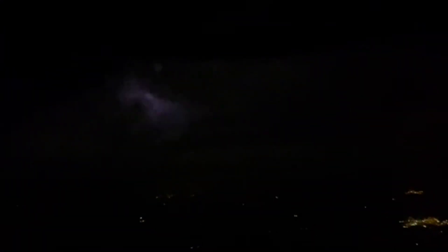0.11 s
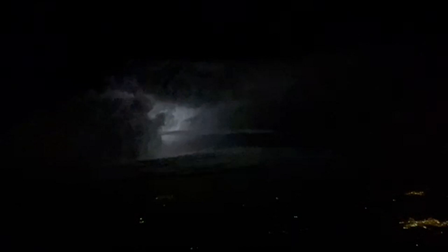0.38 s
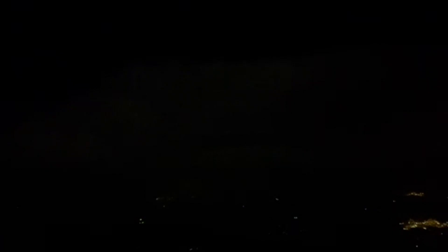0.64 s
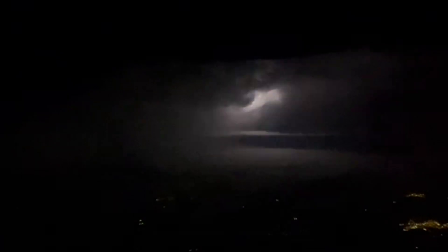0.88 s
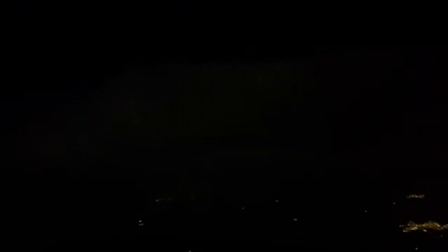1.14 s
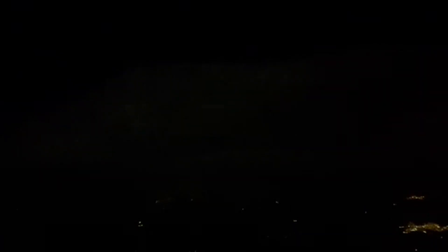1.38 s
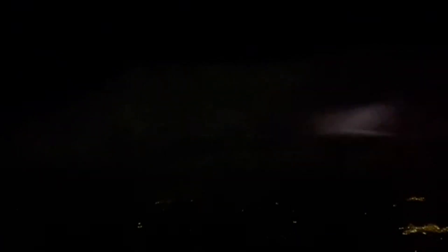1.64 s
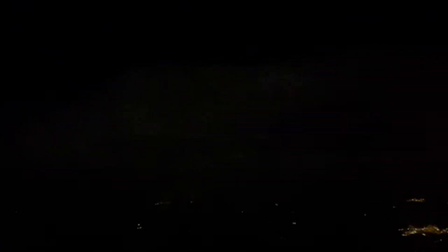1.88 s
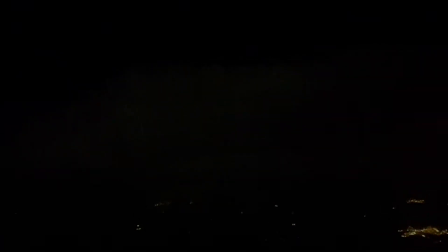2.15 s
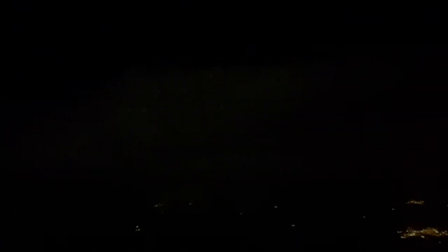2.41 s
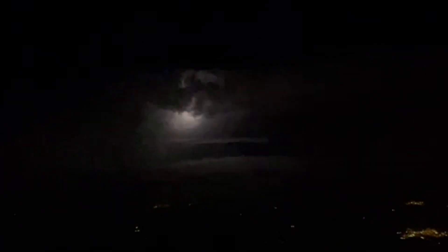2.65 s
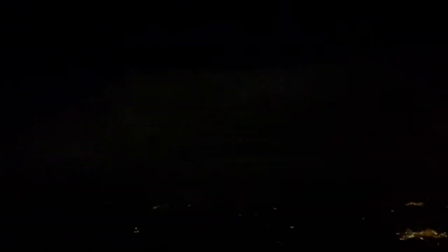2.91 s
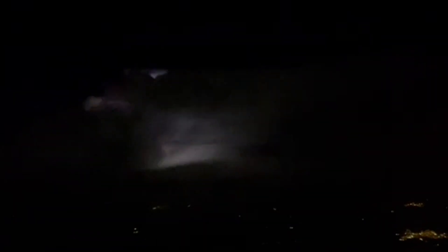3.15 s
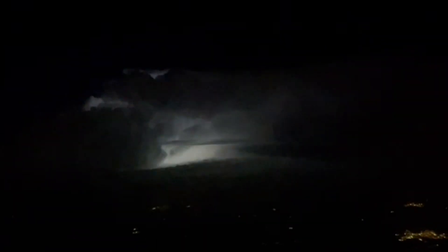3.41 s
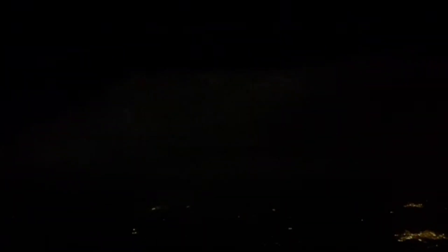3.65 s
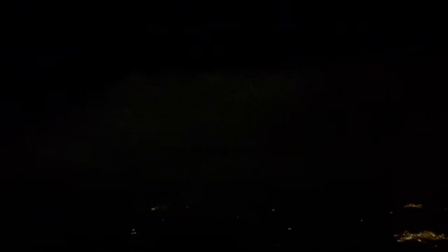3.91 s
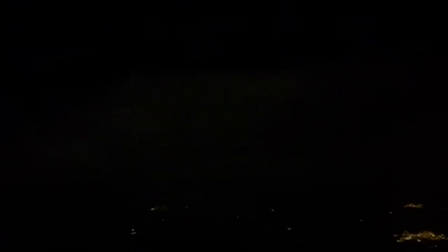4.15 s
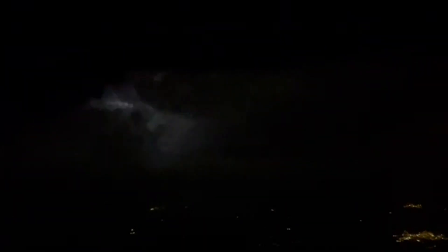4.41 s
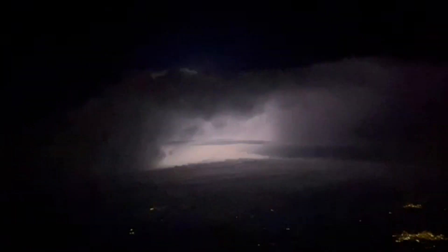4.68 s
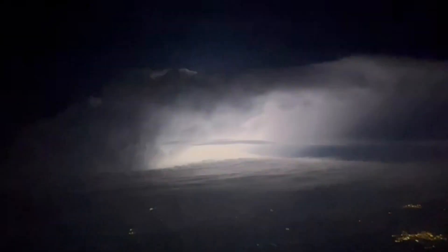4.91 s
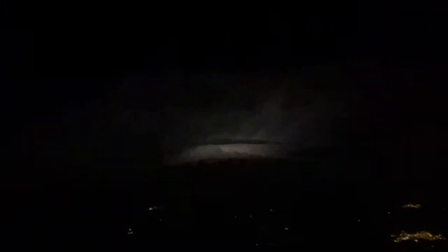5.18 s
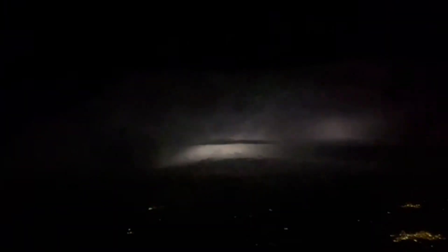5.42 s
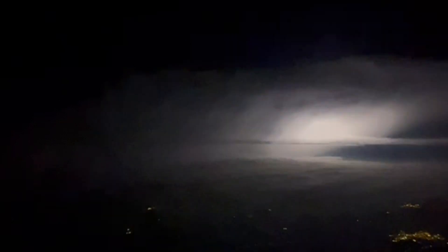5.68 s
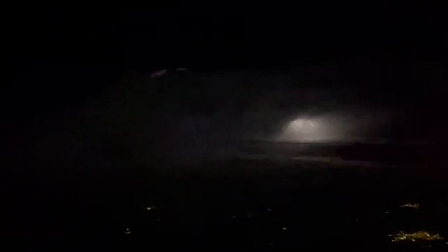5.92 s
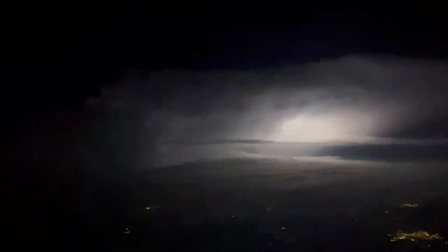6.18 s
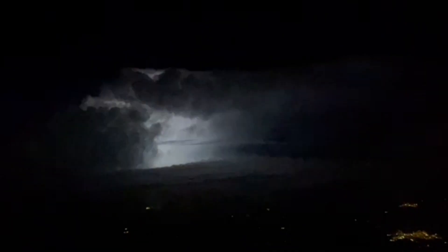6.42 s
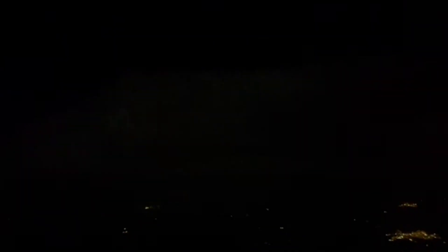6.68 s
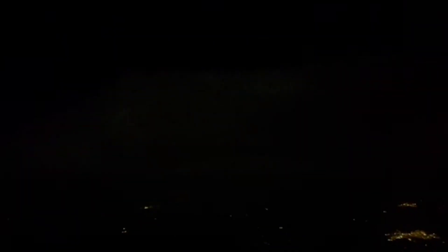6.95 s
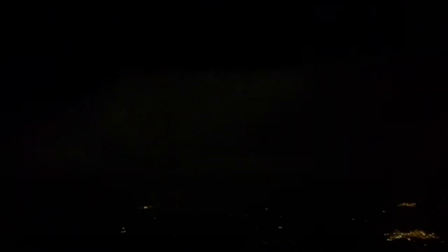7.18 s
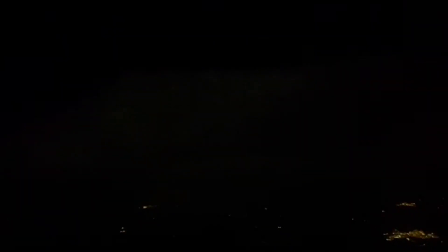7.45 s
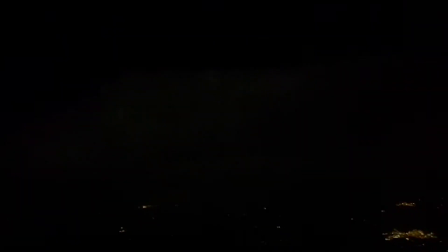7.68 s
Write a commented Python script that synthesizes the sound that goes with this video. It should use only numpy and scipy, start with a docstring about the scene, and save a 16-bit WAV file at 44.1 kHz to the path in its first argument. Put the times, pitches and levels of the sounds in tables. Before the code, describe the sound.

Inside an airliner cruising at night past a distant thunderstorm, a dense low roar of airflow fills everything from start to end. Under it a noisy bass boom wavers and swells irregularly, while two engines give a faint low hum that slowly beats. Air vents add a barely audible hiss. Close stereo pickup by the window; the lightning flashes make no sound.

```python
"""Airliner cabin in cruise

Close to a window, airflow shakes the fuselage skin into a deep roar: noise shaped by wall and window resonances.
A low boom, a narrow noisy tone swung by random pushes, wavers, swells and sinks by chance. Two engines hum at
almost the same pitch, two sines that beat slowly. The air vents add a faint hiss of patchy noise and one thin
whistle. Two close microphone ports receive it all, followed by gentle gain control and a peak limiter."""
import sys
import numpy as np
from scipy import signal
from scipy.fft import rfft, irfft, next_fast_len
from scipy.io import wavfile
from scipy.ndimage import uniform_filter1d, minimum_filter1d, map_coordinates

SR = 44100
rng = np.random.default_rng(int(sys.argv[2]) if len(sys.argv) > 2 else 0)


def put_to_file(sound):
    """Save the sound as 16-bit audio at rate SR, in the file named by the first command-line argument."""
    columns = np.atleast_2d(sound).T  # one column per channel
    safe = np.clip(columns, -1, 1)
    whole_steps = np.round(safe * 32767)
    wavfile.write(sys.argv[1], SR, whole_steps.astype(np.int16))


def attenuation_scalar(level_db):
    """Turn a level in dB into a linear amplitude multiplier (20 dB per decade)."""
    decades = np.asarray(level_db, float) / 20
    return 10 ** decades


N = 344862  # length in samples


def unit(x):
    """Normalization: the signal scaled to an rms of 1."""
    return x / np.sqrt(np.mean(x ** 2))


def along(points, hz):
    """Logarithmic frequency scale: (Hz, value) points interpolated on a log axis."""
    point_hz, value = np.transpose(points)
    return np.interp(np.log(hz + 1), np.log(point_hz + 1), value, left=value[0], right=value[-1])


def wobble(rate):
    """Slow random modulation: a smooth curve through random knots, rate knots a second."""
    knots = rng.standard_normal(int(N * rate / SR) + 4)
    return map_coordinates(knots, [np.arange(N) * rate / SR])


def rush(colour_db, patchy_db):
    """Stereo image: patchy noise of rms 1, its likeness, phase and balance set by frequency."""
    # likeness of left and right: freq_hz, likeness (0-1)
    likeness = [(110, 1), (155, 0.94), (200, 0.97), (270, 0.88), (350, 1), (430, 0.76), (620, 0.7),
                (720, 0.16), (1200, 0), (2000, 0.8), (3600, 0.5), (4400, 0.97), (7000, 1), (9000, 0.97),
                (11500, 1)]
    # phase by which left leads right: freq_hz, lead_rad
    phase_lead = [(100, 0), (360, 0), (620, .5), (800, -2.5), (1400, -1), (1750, -1), (2300, -0.86),
                  (5200, 0.84), (6700, 0), (8000, 0.94), (8600, 0), (9050, -1), (10100, -3), (10350, -3),
                  (11650, -6)]
    # level of left minus right: freq_hz, difference_db
    balance = [(60, 0.45), (450, 1), (1100, 1), (1900, -1), (2500, 0.5), (4600, 2), (5800, 2), (6400, 0.0)]

    spectrogram = signal.stft(rng.standard_normal((2, N)), nperseg=512)[2]
    # random gains smoothed over 8 frequency bins and 12 time frames
    field = uniform_filter1d(rng.standard_normal(spectrogram.shape[1:]), size=8, axis=0)
    field = uniform_filter1d(field, size=12, axis=1)
    patches = attenuation_scalar(patchy_db * unit(field))
    pair = signal.istft(spectrogram * patches, nperseg=512)[1][:, :N]

    size = next_fast_len(N + 8192)
    hz = np.fft.rfftfreq(size, 1 / SR)
    shared, own = rfft(pair, size)
    # cos(2 * angle) is the likeness of the sum and difference mixes
    angle = np.arccos(np.clip(along(likeness, hz), 0, 1)) / 2
    stereo = np.cos(angle) * shared + np.outer([1, -1], np.sin(angle) * own)
    # half of the balance and lead on each side
    offset = attenuation_scalar(along(balance, hz) / 2) * np.exp(0.5j * along(phase_lead, hz))
    coloured = stereo * [offset, 1 / offset] * attenuation_scalar(colour_db(hz))
    return unit(irfft(coloured, size)[:, :N])


def roar():
    """Turbulent boundary layer: air drums on the skin, and panel resonances shape it unevenly left and right."""
    # airflow roar through the wall: freq_hz, relative_level_db (per Hz)
    wall_noise = [(20, -62), (33, -51.5), (42, -42.5), (62, -31.5), (95, -39), (170, -44), (255, -46),
                  (450, -47), (560, -51.5), (1000, -58), (1250, -61.5), (1600, -73.5), (2200, -81.5),
                  (3800, -100)]
    # resonances of wall panels and window: centre_hz, width_hz, left_lift_db, right_lift_db
    panels = [(72, 21, -1.5, 0.5), (140, 24, 3.5, 2.5), (207.6, 17, 3.5, 5), (258, 16, -1, -1),
              (286.8, 20, 5.5, 4.5), (347, 57.6, 9, 10), (393, 69, 4.5, 5.5), (533, 23, 1, 1),
              (649, 59, 5, 4.5), (733, 23, 3.5, 1.5), (780, 38, -1.5, -2.5), (907.6, 88, 4.5, 8.5),
              (1474, 150, 1, 3.5), (1950, 74, 1, 3), (2600, 430, 1.5, 1), (3160, 420, 4.5, 3)]

    def colour_db(hz):
        """Superposed resonance curves: each lift falls to half its dB at half a width from its centre."""
        lift_db = 0
        for centre_hz, width_hz, *side_db in panels:
            lift_db = lift_db + np.outer(side_db, 1 / (1 + (2 * (hz - centre_hz) / width_hz) ** 2))
        cut_db = -60.0 * (hz > wall_noise[-1][0])  # above the last point
        return along(wall_noise, hz) + lift_db + cut_db

    level_db = -12.0 + 0.12 * wobble(2.5)
    return attenuation_scalar(level_db) * rush(colour_db, patchy_db=0.31)


def boom():
    """Randomly driven resonance: turbulence pushes the lowest cabin mode into a narrow, wavering noisy drone."""
    # one chance run of the noisy boom's pitch and level, with further random swing added:
    # time_s, pitch_hz, level_db
    chance_run = [(0.0, 68.7, -22.5), (0.17, 68.6, -20.5), (0.3, 77.36, -20.5), (0.41, 76.8, -23.5),
                  (0.5, 72.65, -18), (0.59, 68.66, -20.5), (0.63, 70.71, -14), (1.18, 75.5, -16),
                  (1.28, 76.4, -29.5), (1.46, 72.1, -13), (1.76, 71.9, -15), (2.2, 76.3, -16),
                  (2.4, 75.9, -24.5), (2.57, 75.9, -9.5), (2.63, 76.2, -21.5), (2.92, 73.0, -16.5),
                  (3.07, 67.9, -20.5), (3.29, 70.9, -14.5), (3.48, 75.9, -23), (3.94, 70.2, -16),
                  (4.4, 67.77, -20), (4.55, 74.8, -17), (4.73, 70.2, -16), (5.03, 73.5, -12.5),
                  (5.38, 68.1, -24), (5.66, 71.8, -10.5), (5.88, 72, -17), (5.99, 70.5, -14.5),
                  (7.08, 74.75, -19), (7.32, 70.2, -16), (7.51, 74.7, -14.5), (7.82, 76.1, -26.5)]
    push_rate, evened = 3, 0.89  # knots a second; how far push sizes are evened out (0-1)

    time_s, pitch_hz, level_db = np.transpose(chance_run)
    t = np.arange(N) / SR
    push = wobble(push_rate) + 1j * wobble(push_rate)
    swing = push / (np.abs(push) + 0.05) ** evened
    phase = 2 * np.pi * np.cumsum(np.interp(t, time_s, pitch_hz)) / SR
    drone = unit(np.real(swing * np.exp(1j * phase)))
    return attenuation_scalar(np.interp(t, time_s, level_db)) * drone


def engines():
    """Beating: two steady tones a fraction of a hertz apart swell and cancel in turn."""
    mean_hz, beat_hz, in_step_s = 204.7, 0.47, 0.465  # mean pitch, difference, a moment near being in step
    level_db = -28.7 + 1.2 * wobble(6.4)  # rms of each tone
    t = np.arange(N) / SR - in_step_s
    # product form of the sum of two sines
    beat = 2 * np.cos(np.pi * beat_hz * t + 0.066 * wobble(0.78))
    return attenuation_scalar(level_db) * np.sqrt(2) * beat * np.sin(2 * np.pi * mean_hz * t)


def vents():
    """Jet noise: fine streams of air give a faint patchy hiss, with one thin unsteady whistle."""
    # colour of the vent hiss: freq_hz, relative_level_db (per Hz)
    jet_noise = [(3600, -99), (4280, -92.5), (4500, -85), (4900, -88), (5600, -87.5), (6100, -92),
                 (6700, -95.5), (7200, -91), (7600, -94.5), (8300, -89), (8900, -92.5), (9500, -90),
                 (10800, -91), (11500, -101.0), (11950, -107), (12400, -108)]
    edged = [(1500, -120)] + list(jet_noise) + [(13000, -140)]

    hiss_db = -51.5 + 0.15 * wobble(8)
    hiss = attenuation_scalar(hiss_db) * rush(lambda hz: along(edged, hz), patchy_db=0.6)
    whistle_db = -75 + 2.5 * wobble(6)  # peak level
    phase = 2 * np.pi * 7128 * np.arange(N) / SR + 1.5 * wobble(25)
    return hiss + attenuation_scalar(whistle_db) * np.sin(phase)


def scene():
    """Superposition: all sources add; the low tones are in phase left and right, 0.4 dB stronger on the left."""
    low_tones = boom() + engines()
    return roar() + vents() + low_tones * attenuation_scalar([[0.2], [-0.2]])


def low_pass(x):
    """Removes everything above the highest recorded frequency."""
    return signal.sosfilt(signal.butter(12, 12400, fs=SR, output="sos"), x)


def record(dry):
    """Dynamic range compression: gain control evens out surges, and a look-ahead limiter holds peaks down."""
    ceiling = 0.915  # share of full scale
    power = np.abs(uniform_filter1d(np.mean(dry ** 2, axis=0), size=3000))
    even = dry * (power / power.mean() + 1e-6) ** -0.08
    needed = np.minimum(1, ceiling / (np.abs(even).max(axis=0) + 1e-9))
    # centred windows, in samples, lower the gain ahead of each peak
    gain = uniform_filter1d(minimum_filter1d(needed, size=400), size=300)
    return low_pass(even * gain)


dry = scene()
out = record(dry)
put_to_file(out)
```